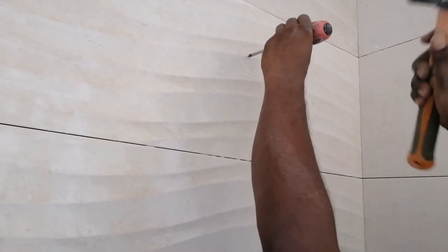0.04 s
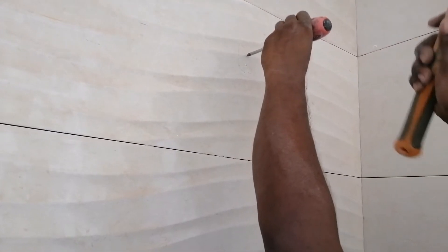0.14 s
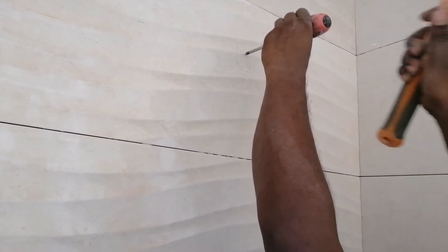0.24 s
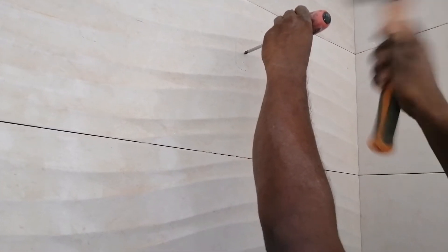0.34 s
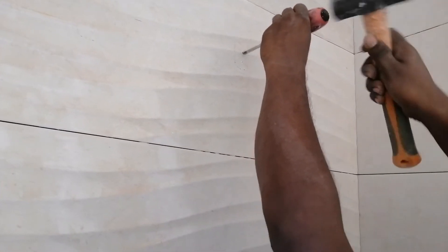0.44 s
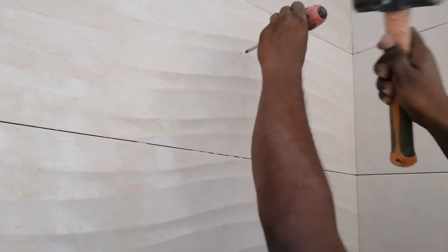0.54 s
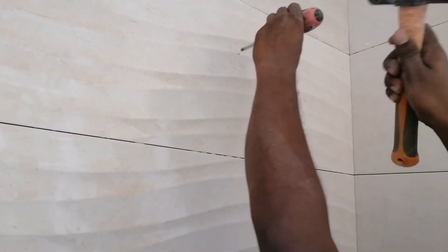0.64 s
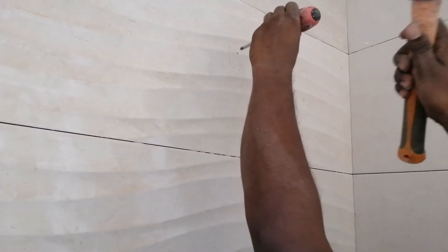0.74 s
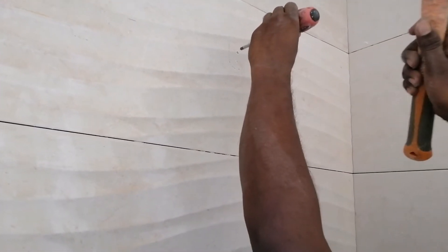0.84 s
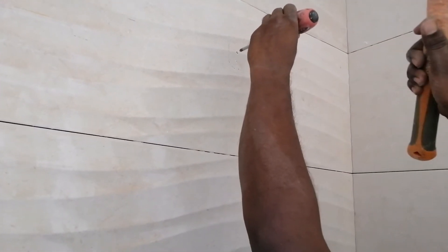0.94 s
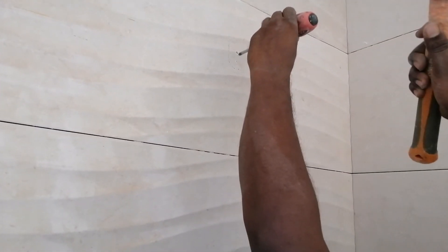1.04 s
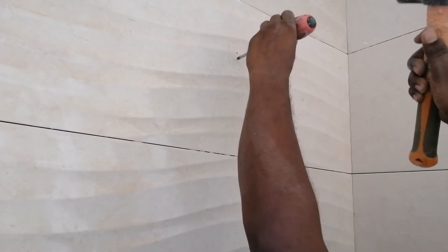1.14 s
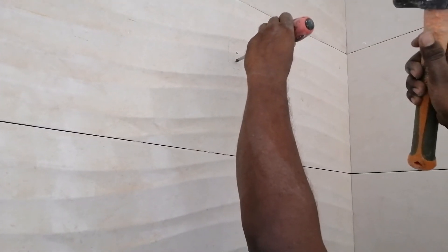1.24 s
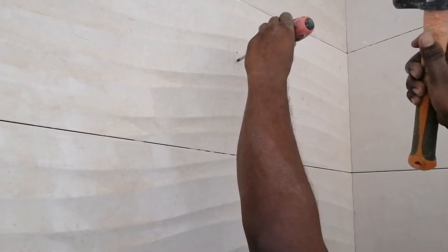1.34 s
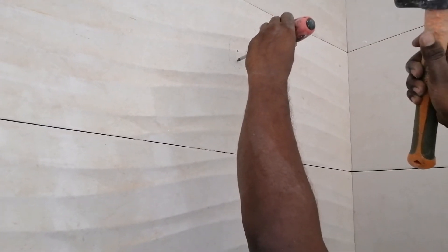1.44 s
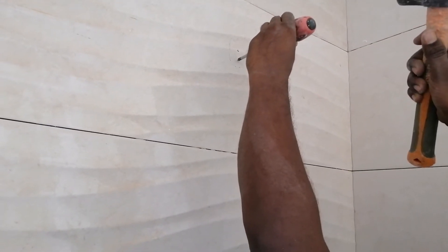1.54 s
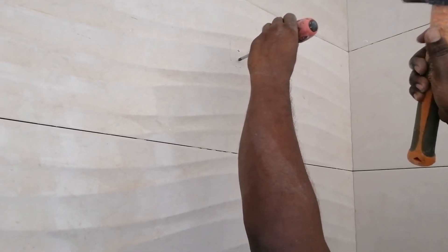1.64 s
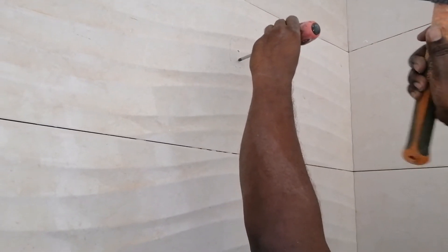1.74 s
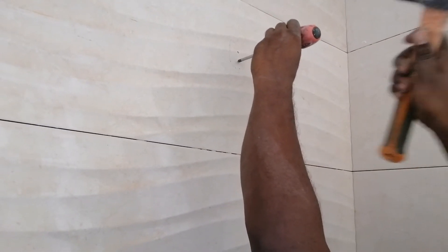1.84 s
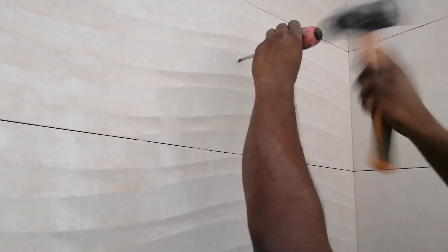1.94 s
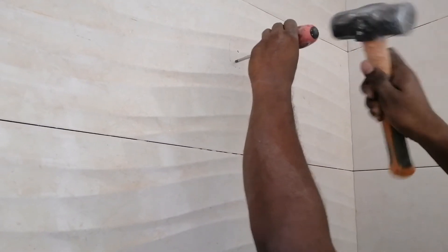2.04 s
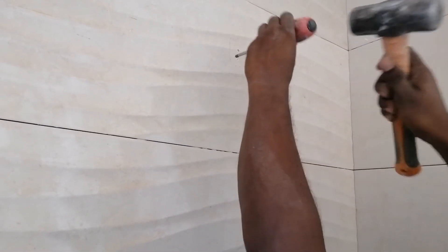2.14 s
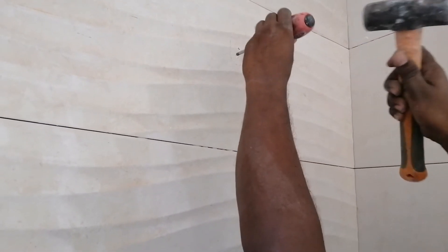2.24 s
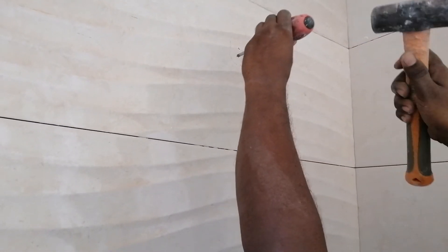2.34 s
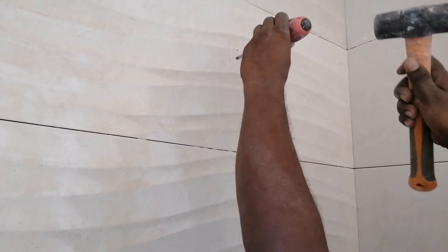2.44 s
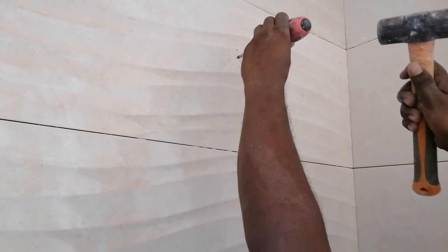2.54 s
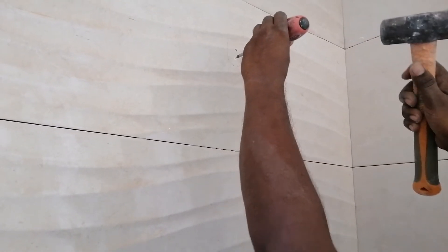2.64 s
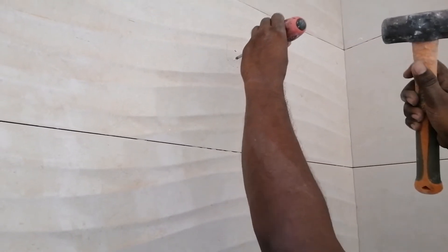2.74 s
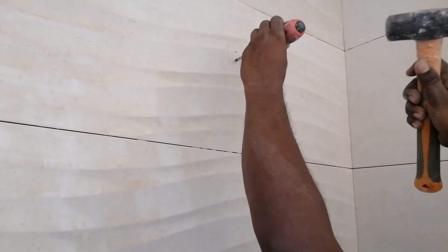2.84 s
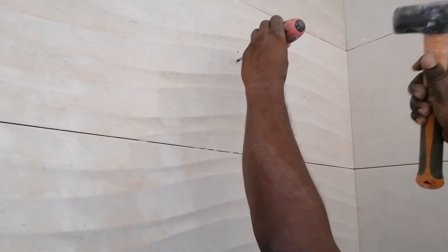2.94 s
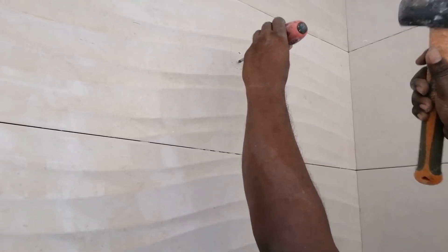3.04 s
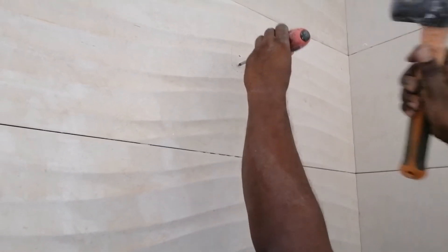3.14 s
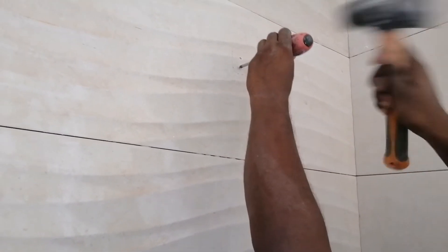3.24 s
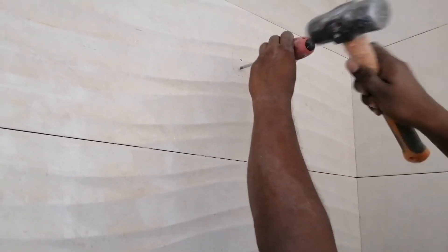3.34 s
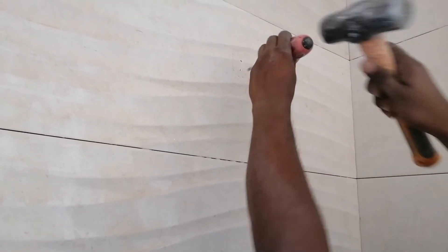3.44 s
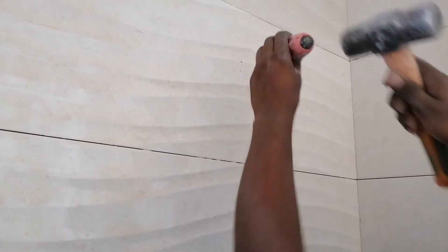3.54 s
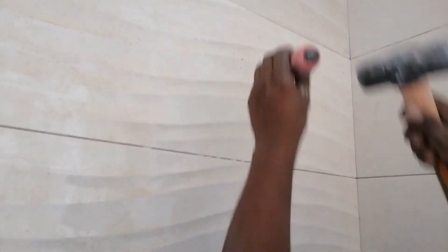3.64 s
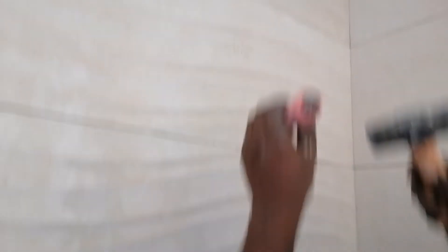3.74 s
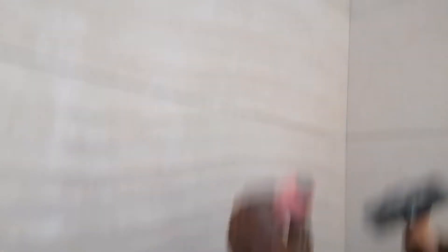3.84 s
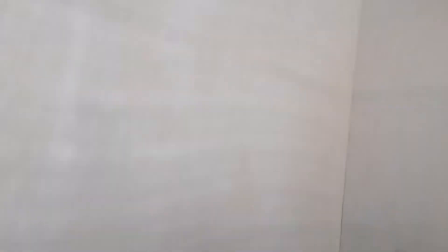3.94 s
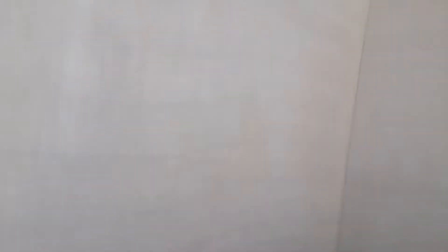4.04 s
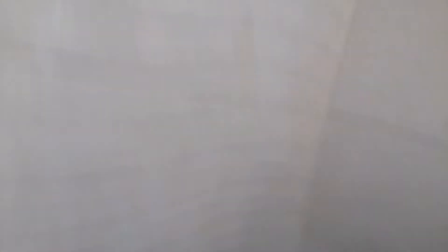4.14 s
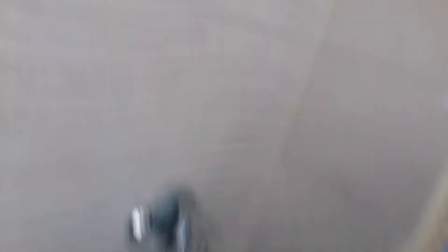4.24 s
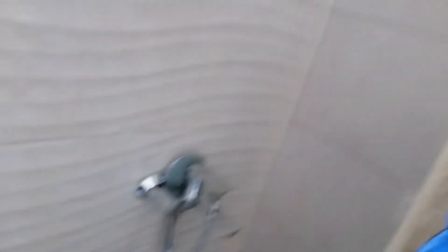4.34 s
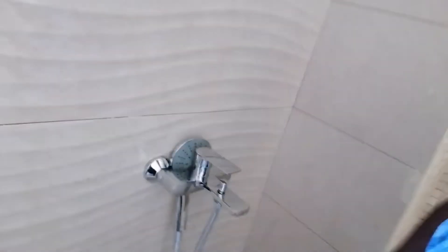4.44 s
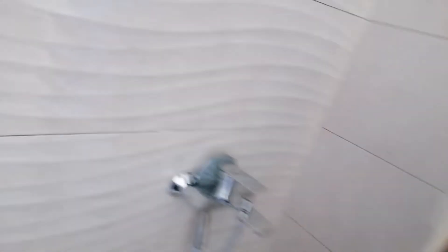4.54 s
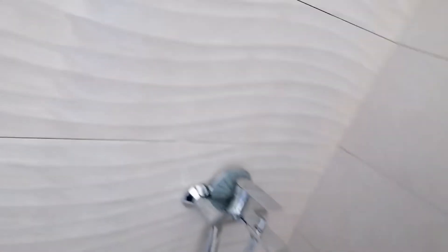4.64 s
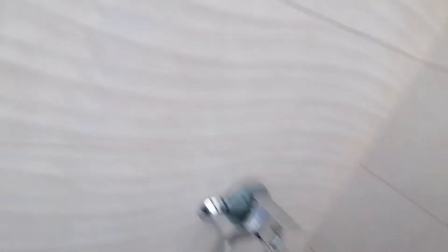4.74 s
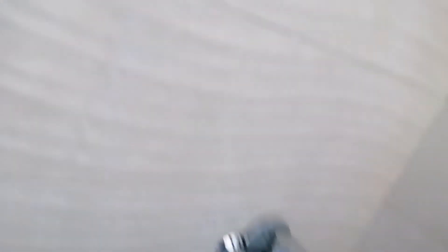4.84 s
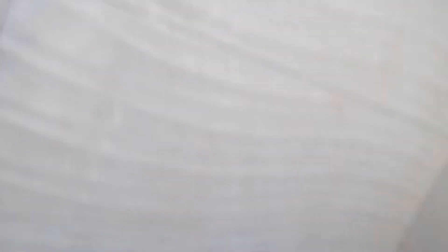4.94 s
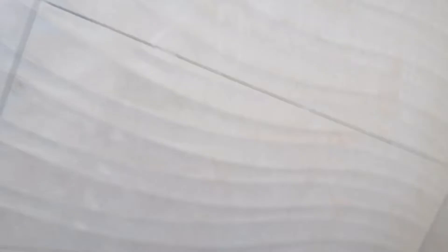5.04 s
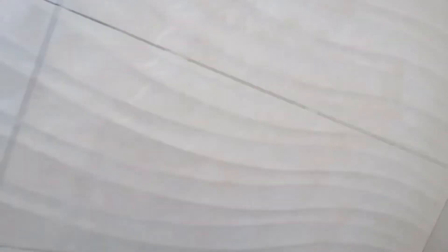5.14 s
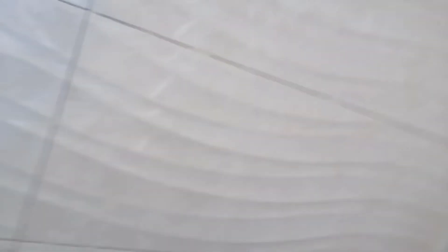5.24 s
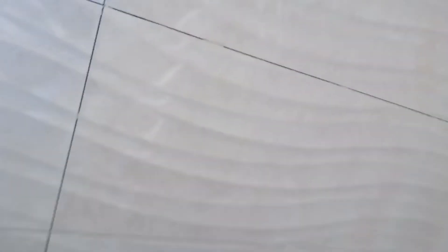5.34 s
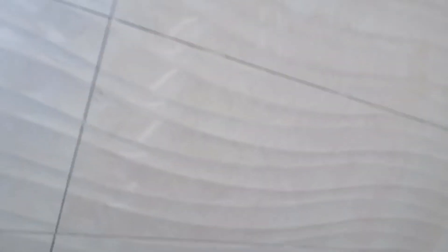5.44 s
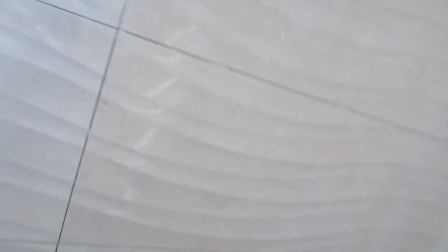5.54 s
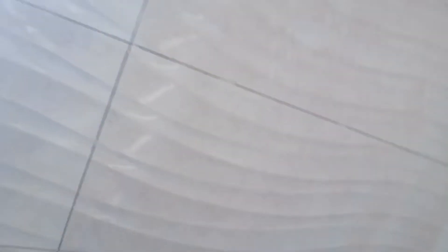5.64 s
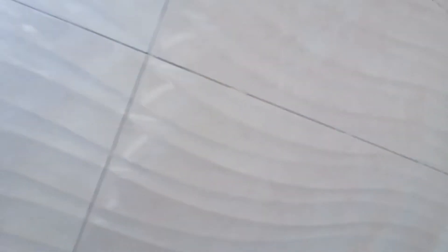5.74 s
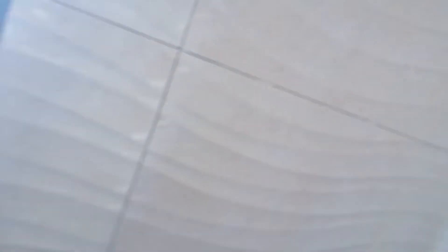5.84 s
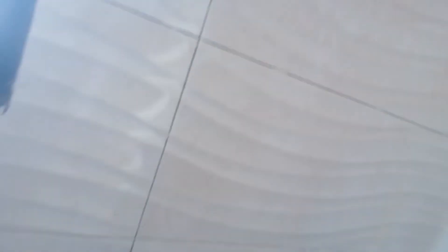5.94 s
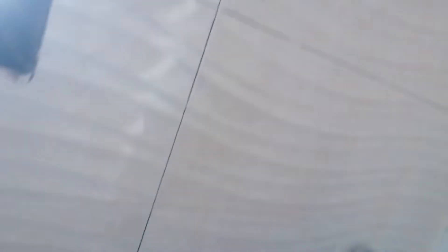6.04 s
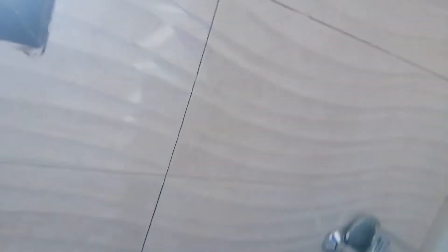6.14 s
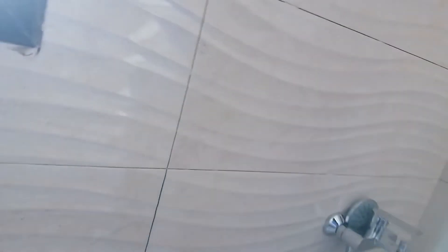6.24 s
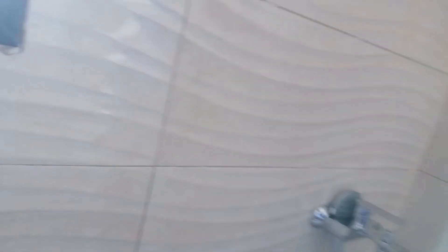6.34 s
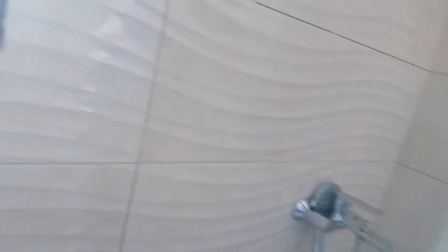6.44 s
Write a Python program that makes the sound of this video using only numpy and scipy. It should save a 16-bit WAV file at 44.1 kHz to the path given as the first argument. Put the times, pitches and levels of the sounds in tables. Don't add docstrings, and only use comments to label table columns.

```python
import sys
import numpy as np
from scipy import signal
from scipy.fft import rfft, irfft, next_fast_len
from scipy.io import wavfile
from scipy.ndimage import uniform_filter1d

SR = 44100
rng = np.random.default_rng(int(sys.argv[2]) if len(sys.argv) > 2 else 0)


def level_to_linear(level):
    exponent = np.asarray(level, float) / 20
    return 10 ** exponent


def unload_audio(sound):
    columns = np.transpose(np.atleast_2d(sound))
    steps = np.round(np.clip(columns, -1, 1) * 32767)
    wavfile.write(sys.argv[1], SR, steps.astype(np.int16))


N = 286650
LEAD = SR // 2

# low_hz, high_hz
PARTS = [(1600, 3500), (62, 220), (220, 650), (650, 1600), (3500, 15000)]


def at_hz(points, hz):
    points_hz, values = np.array(points).T
    return np.interp(np.log(hz), np.log(points_hz), values)


def rms_one(x):
    return x / np.sqrt(np.mean(x ** 2) + 1e-20)


def band(x, low_hz, high_hz, order=2):
    edges_hz = [low_hz, min(high_hz, 0.45 * SR)]
    return signal.sosfilt(signal.butter(order, edges_hz, "band", fs=SR, output="sos"), x)


def resonance(x, hz, width_hz):
    r = np.exp(-np.pi * width_hz / SR)
    feedback = [1, -2 * r * np.cos(2 * np.pi * hz / SR), r * r]
    return signal.lfilter(np.array([1, 0, -1]) * (1 - r * r) / 2, feedback, x)


def convolve(x, kernel):
    size = next_fast_len(len(x) + kernel.shape[1])
    return irfft(rfft(x, size) * rfft(kernel, size), size)[:, LEAD:LEAD + N]


def strikes(start_s, db):
    clicks = np.zeros(N + LEAD)
    clicks[np.round(start_s * SR).astype(int) + LEAD] = level_to_linear(db)
    return clicks


def strokes(rows, more_db=0):
    peak_s, db, rise_s, fall_s = np.array(rows).T[:4, :, None]
    coarse = np.arange(0, N + 64, 64)
    t = coarse / SR - peak_s
    away = np.where(t < 0, -t / rise_s, t / fall_s) ** 1.53
    stroke_db = db + more_db - 20.5 * away
    return np.interp(np.arange(N), coarse, np.sqrt(np.sum(level_to_linear(2 * stroke_db), 0)))


def ports(x):
    # pitch_hz, width_hz, left_db, right_db
    cavities = [(2326, 460, 7.5, -39), (5460, 2280, 6.5, -25.5)]
    for hz, width_hz, left_db, right_db in cavities:
        x = x + level_to_linear(np.array([[left_db], [right_db]])) * resonance(x, hz, width_hz)
    return x


def stereo_bands(count, spectrum, dying):
    # pitch_hz, likeness (0 to 1)
    likeness = [(30, 0.57), (150, 0.88), (350, 0.85), (700, 0.28), (1500, 0.026), (12000, 0.11)]
    # pitch_hz, left_minus_right_db
    lean = [(60, -1), (120, 8.5), (240, -1), (480, 1.5), (950, -0.5), (1890, 1.5), (3770, -5), (7520, -2),
            (15000, -12)]
    # pitch_hz, t60_s
    decay = [(80, 1.06), (210, 0.98), (560, 1.01), (1470, 0.96), (2500, 0.84), (3880, 0.86), (10200, 0.49)]
    t = np.arange(count) / SR
    edges_hz = 20 * 2 ** np.arange(0, 9.7, 0.25)
    white = rng.standard_normal((2, 2, count))
    opposite = np.array([[1], [-1]])
    out = 0
    for k, (low_hz, high_hz) in enumerate(zip(edges_hz, edges_hz[1:])):
        mid, side = band(white[k % 2], low_hz, high_hz)
        hz = np.sqrt(low_hz * high_hz)
        alike = np.clip(at_hz(likeness, hz), 0, 1)
        pair = np.sqrt(1 + alike) * mid + np.sqrt(1 - alike) * side * opposite
        balance = level_to_linear(at_hz(lean, hz) / 2 * opposite)
        level_db = at_hz(spectrum, hz) - dying * 60 * t / at_hz(decay, hz)
        out = out + pair * balance * level_to_linear(level_db)
    return out


def floor():
    # pitch_hz, level_db (per Hz)
    bed_spectrum = [(12, -31), (20, 10), (34, -5.5), (54, -19), (82, 1.5), (119, -7), (266, -7), (382, -7),
                    (491, -15), (725, -12.5), (1230, -17), (2090, -21.5), (2920, -33), (4950, -32.5),
                    (15500, -63.5)]
    bed = ports(stereo_bands(N + LEAD, bed_spectrum, dying=0))[:, LEAD:]
    return level_to_linear(-56) * bed / np.std(bed.mean(0))


def bathroom():
    # pitch_hz, level_db (per Hz)
    colour = [(35, -43), (60, -1), (76, -3), (132, -4), (186, 8.5), (219, -11.5), (257, 3), (324, -10.5),
              (458, -3), (648, -20), (1390, -20), (2360, 2), (3190, -10.5), (9450, -24.5), (15000, -41)]
    # pitch_hz, level_db, t60_s
    room_modes = [(79.7, 7, 1.93), (88, 6.5, 1.57), (123.2, -2.5, 1.76), (152, 7.5, 1.25), (194, 3.5, 2.24),
                  (201.2, 1, 1.6), (258, 2, 0.94), (324, 3.5, 0.43), (436.2, -4, 1.25)]
    t = np.arange(2 * SR) / SR
    tail = stereo_bands(2 * SR, colour, dying=0.86) * (1 - np.exp(-t / 0.0027))
    swell = 1 - np.exp(-t / 0.022)
    modes = 0
    for hz, db, t60_s in room_modes:
        modes = modes + level_to_linear(db - 60 * t / t60_s) * np.sin(2 * np.pi * hz * t + rng.uniform(0, 6.02))
    tail = ports(tail + modes * swell * level_to_linear(-14) * np.std(tail[:, :SR // 8]))
    parts = [band(tail, low_hz, high_hz, order=5) for low_hz, high_hz in PARTS]
    parts[1] = parts[1] * swell
    suppression = level_to_linear(-12 / (1 + np.exp((0.43 - t) / 0.13)))
    parts = [part * suppression for part in parts]
    return [part / np.std(part.mean(0)[:SR // 20]) for part in parts]


def bright(room):
    hard = signal.lfilter([1, -0.9], [1], room)
    return hard / np.std(hard.mean(0)[:SR // 20])


def contacts():
    earlier_parts = [-34.5, -39.5, -25, -33, -80]
    # start_s, force_db, shaft_ring_db, sharpness_db
    hammer = [
        (0.513, 0, 0, 1.5),
        (2.079, 0.5, -4, -1),
        (3.4452, 0, -0.5, -3.5),
    ]
    hammer_parts = np.array([-3.5, -29, -24.5, -30, -31])
    # start_s, force_db, hardness_db_per_octave, steel_db
    knocks = [
        (2.934, -60, -0.5, 9),
        (4.0039, -49.5, -3.5, 16.5),
        (4.5054, -56, 0.5, 3),
        (4.7384, -56, 0.5, 5),
        (4.794, -43.5, 2.5, 20.5),
        (5.1097, -52.5, 2.5, 16.5),
        (5.5663, -35, -1.5, 23),
        (5.8459, -36, 1, 26.5),
    ]
    knock_parts = np.array([0.5, -9, 0, 0.5, 0.3])
    octaves = np.log2(np.sqrt(np.prod(PARTS, 1)) / 1020)
    ring, *_, tick = np.eye(len(PARTS))
    rows = [[-0.38, *earlier_parts]]
    for s, force_db, ring_db, sharp_db in hammer:
        rows.append([s, *(force_db + hammer_parts + ring_db * ring + sharp_db * tick)])
    for s, force_db, hard_db, steel_db in knocks:
        rows.append([s, *(force_db + knock_parts + hard_db * octaves + steel_db * ring)])
    return np.array(rows)


def blows(rooms):
    direct = [1, -22, 4, 7, 4.5]
    rows = contacts()
    start_s = rows[:, 0]
    on_wall = start_s < 3.8
    t = np.arange(2048) / SR
    rise = 1 - np.exp(-t / 0.00025)
    out = 0
    for k, room in enumerate(rooms):
        kernel = room.copy()
        crack = room[:, 1024:1024 + len(t)] * rise
        kernel[:, :len(t)] += level_to_linear(direct[k] - 60 * t / 0.0188) * crack
        db = rows[:, k + 1] + (-17.5 if k == 0 else 0)
        if k == 1:
            floor_thuds = strikes(start_s[~on_wall], db[~on_wall])
            out = out + convolve(floor_thuds, band(kernel, 113, 280, order=3))
            db = np.where(on_wall, db, -120)
        out = out + convolve(strikes(start_s, db), kernel)
    return out


def shaft():
    # peak_s, level_db
    pings = [
        (0.5148, 0.3),
        (2.08, -3.5),
        (2.9366, -31.5),
        (3.444, -36),
        (5.1125, -23.5),
        (5.8484, -1.5),
    ]
    # pitch_hz, width_hz
    steel_modes = [(2220, 470), (2560, 500), (2600, 1000)]
    ping_db = np.array([1.5, -7])[:, None]
    ping = 1.0 * (np.arange(2048) == np.array([[28], [0]]))
    for hz, width_hz in steel_modes:
        ping = resonance(ping, hz, width_hz)
    peak_s, level_db = np.array(pings).T
    start_s = peak_s - 0.0016
    return convolve(strikes(start_s, level_db), level_to_linear(ping_db) * ping / ping.max())


def snaps(rooms):
    # start_s, peak_db, pitch_hz
    grit = [(1.0313, -47.5, 5760), (1.5842, -38, 12000), (4.7409, -34.5, 5700), (4.9713, -25, 5060),
            (5.1116, -25.5, 6170), (5.1285, -29, 5600), (5.161, -33, 6000), (5.172, -27, 5800),
            (5.234, -30.5, 3200), (5.5022, -38, 5820), (5.8258, -12, 6500), (5.828, -14, 4870),
            (5.8305, -22.5, 7000), (5.836, -19.5, 10100), (5.8408, -27, 6500), (5.9065, -21, 7060),
            (5.9275, -26, 6740), (6.0174, -41, 4670), (6.263, -35, 3840), (6.4652, -45, 3780)]
    out = np.zeros(N + LEAD)
    fade = level_to_linear(-60 * np.arange(512) / SR / 0.004)
    for s, db, hz in grit:
        i = round(s * SR) + LEAD
        burst = rng.standard_normal(512) * fade
        ring = resonance(resonance(burst, hz, 0.5 * hz), hz, 0.5 * hz)
        out[i:i + 512] += level_to_linear(db) * ring / np.abs(ring).max()
    near = out[LEAD:] * level_to_linear([[2], [-2]])
    return near + level_to_linear(-37.5) * convolve(out, bright(bright(rooms[4])))


def hollows(rooms):
    # start_s, level_db, pitch_hz, width_hz
    bodies = [(2.935, -72, 2675, 270), (4.004, -70, 156, 50.4), (4.003, -63.5, 290, 250),
              (4.79, -59.5, 1320, 170), (4.84, -69, 376, 120), (5.123, -64, 970, 303),
              (5.567, -40, 808, 250), (5.567, -38.5, 970, 330), (5.6, -58, 610, 160),
              (5.567, -41, 2150, 1800), (4.004, -56.5, 850, 770), (4.003, -72, 1360, 140),
              (5.951, -60, 329, 59), (6.001, -74, 343, 61), (6.048, -74, 296, 62), (6.12, -90, 334, 62)]
    out = np.zeros(N + LEAD)
    for s, db, hz, width_hz in bodies:
        i = round(s * SR) + LEAD
        ring = resonance(resonance(np.arange(4096) == 0, hz, width_hz), hz, width_hz)
        out[i:i + 4096] += level_to_linear(db) * ring / np.sqrt(np.sum(ring ** 2)) * np.sqrt(500 / width_hz)
    kernel = band(rooms[1], 116, 200) * level_to_linear(-16.0) + rooms[2] + rooms[3] + rooms[0]
    kernel[:, 0] += level_to_linear(39.5)
    return convolve(out, kernel)


def scuffing(rooms):
    # peak_s, level_db, rise_s, fall_s, sole_weight_db
    scrapes = [(3.97, -55.5, 0.16, 0.17, 7), (4.28, -57, 0.092, 0.15, 6), (4.54, -37.5, 0.065, 0.13, -12),
               (4.751, -42.5, 0.016, 0.058, 6.5), (4.85, -19, .05, .18, -11), (5.15, -38, .03, 0.089, -4.5),
               (5.53, -35, .15, .12, -8), (5.61, -30.5, 0.028, .12, 5.5), (5.9, -19.5, 0.07, 0.24, -11.5),
               (6.06, -22, 0.098, 0.22, -7), (6.22, -32, .1, 0.093, -2)]
    # peak_s, level_db, rise_s, fall_s
    rustles = [(3.97, -52, 0.17, 0.058), (4.26, -52.5, .1, .15), (4.4, -35, .05, .12),
               (4.53, -33, 0.16, 0.12), (4.765, -41, .025, 0.061), (4.84, -23.5, .05, 0.18),
               (5.3, -48, 0.082, 0.14), (5.52, -37.5, 0.15, .1), (5.68, -32, 0.13, 0.17),
               (5.88, -34, .03, .12), (6.08, -28.5, 0.13, 0.25), (6.385, -42, 0.052, 0.039)]
    # low_hz, high_hz, over_room_db
    close_bands = [(1660, 3000, 8.5), (587, 1770, 8.5), (4860, 8220, 5.5)]
    heard = [rooms[0], rooms[3], rooms[4] + level_to_linear(15.0) * bright(rooms[4])]
    click = np.arange(4096) == np.array([[9], [0]])
    weight_db = np.array(scrapes)[:, 4:]
    levels = [strokes(scrapes), strokes(scrapes, weight_db), strokes(rustles)]
    out = 0
    for room, level, (low_hz, high_hz, close_db) in zip(heard, levels, close_bands):
        sizes = level_to_linear(2.5 * np.minimum(rng.exponential(1, N), 5)) * rng.choice([-1, 1], N)
        grains = rms_one(sizes * (rng.random(N) < 2500 / SR))
        grains = grains * level * level_to_linear(-11.5)
        close = ports(band(click, low_hz, high_hz))
        kernel = room / np.sqrt(np.sum(room.mean(0) ** 2))
        kernel[:, :4096] += level_to_linear(close_db) * close / np.sqrt(np.sum(close ** 2) / 2)
        out = out + convolve(np.pad(grains, (LEAD, 0)), kernel)
    return out


def drags():
    # peak_s, level_db, rise_s, fall_s, pitch_hz
    shifts = [(4.015, -39, .015, 0.26, 155), (4.24, -45, .12, .22, 125), (5.17, -52, .05, .12, 125),
              (5.52, -48.5, 0.053, .08, 156), (5.65, -40, .1, 0.17, 121), (5.64, -41, .06, 0.23, 196),
              (6.07, -36.5, .3, .24, 124), (6.11, -42.5, .3, 0.21, 195), (6.5, -52.5, 0.065, .1, 160),
              (4.93, -54, 0.42, .3, 150)]
    width_hz = 6.4
    rub = rng.standard_normal(N)
    out = 0
    for row in shifts:
        hz = row[-1]
        hum = resonance(resonance(rub, hz, width_hz), hz, 1.7 * width_hz)
        power = hum ** 2
        swing = np.sqrt(uniform_filter1d(power, SR // 20) + 0.1 * np.mean(power))
        out = out + strokes([row]) * hum / swing
    return out * level_to_linear([[0.8], [-0.8]])


def scene():
    rooms = bathroom()
    tools = blows(rooms) + shaft() + hollows(rooms)
    friction = snaps(rooms) + scuffing(rooms) + drags()
    return tools + friction + floor()


def low_pass(x):
    return signal.sosfilt(signal.butter(12, 15830, fs=SR, output="sos"), x)


def record(dry):
    knee_db, squeeze, release_db_s, smooth_s = -43.5, 0.39, 87, 0.033
    level_db = 10 * np.log10(uniform_filter1d(np.mean(dry ** 2, 0), 256) + 1e-12)
    ramp = release_db_s * np.arange(N) / SR
    held_db = np.maximum.accumulate(np.maximum(level_db - knee_db, 0) + ramp) - ramp
    r = np.exp(-1 / (smooth_s * SR))
    gain = level_to_linear(-squeeze * signal.lfilter([1 - r], [1, -r], held_db))
    dull = signal.sosfilt(signal.butter(10, 15200, fs=SR, output="sos"), dry)
    mix = np.clip(dull * gain, -1, 1)
    return low_pass(mix)


dry = scene()
out = record(dry)
unload_audio(out)
```